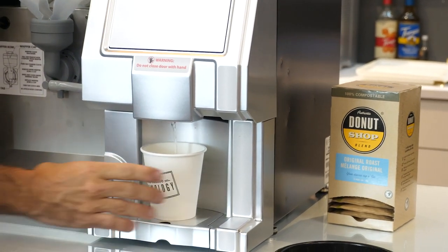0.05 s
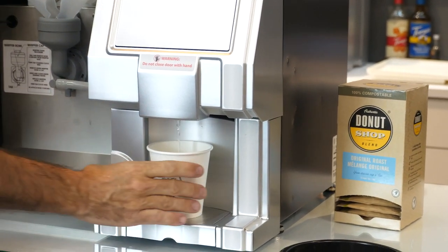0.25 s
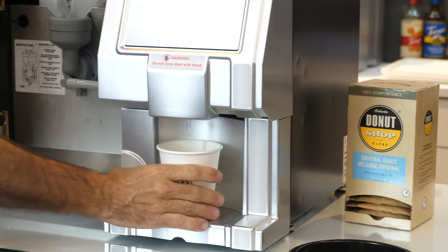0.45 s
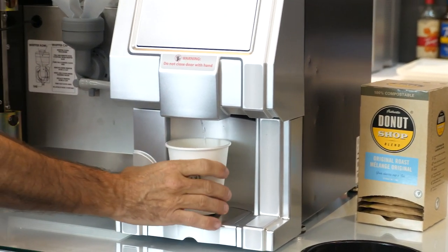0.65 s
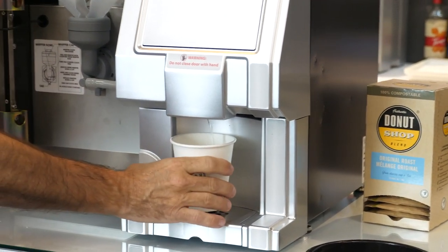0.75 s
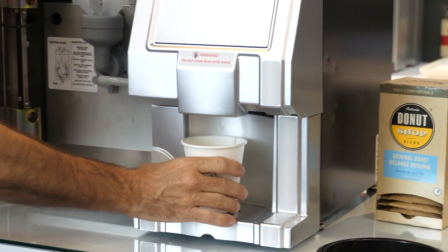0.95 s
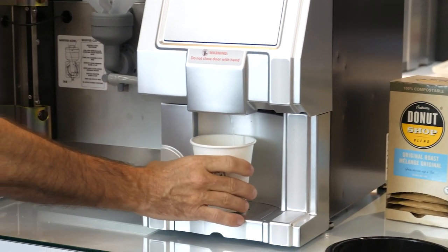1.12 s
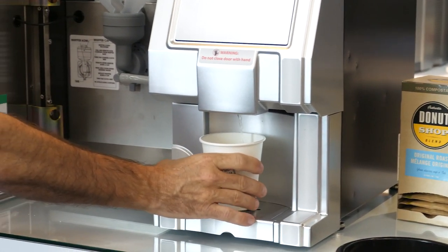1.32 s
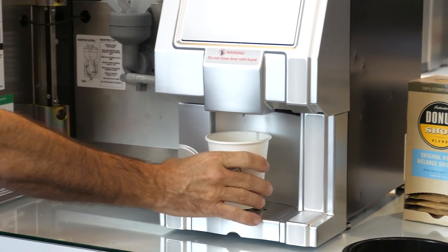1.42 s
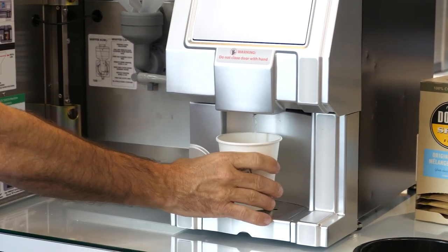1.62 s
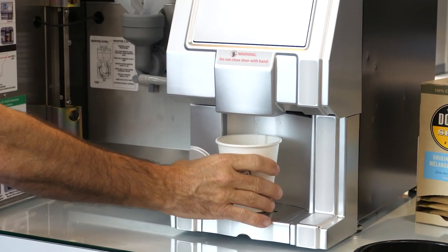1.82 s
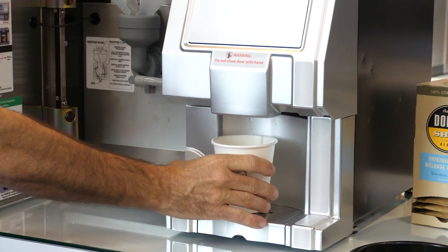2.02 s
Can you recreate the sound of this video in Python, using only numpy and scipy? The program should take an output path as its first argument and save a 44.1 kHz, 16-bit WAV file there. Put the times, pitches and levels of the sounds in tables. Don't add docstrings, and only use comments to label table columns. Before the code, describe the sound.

Water dribbles and plops into a paper cup, gurgling unevenly over a low machine hum.

```python
import sys
import numpy as np
from scipy import signal
from scipy.fft import rfft, irfft, next_fast_len
from scipy.io import wavfile

SR = 44100
rng = np.random.default_rng(int(sys.argv[2]) if len(sys.argv) > 2 else 0)


def transcribe(signal):
    frames = np.atleast_2d(signal).T
    limited = np.clip(frames, -1, 1)
    pcm = np.round(limited * 32767).astype(np.int16)
    wavfile.write(sys.argv[1], SR, pcm)


def undo_db(level):
    steps = np.asarray(level, float) / 20
    return 10 ** steps


N = 91507

# [t/s, hum level/dB]
PUMP_LOAD = [
    (0.0, -55.5),
    (0.84, -51.5),
    (2.07, -52),
]
# [multiple of HUM_HZ, level/dB, wobble/dB]
HUM_LINES = [(.5, -13, 1), (1, 1, 0.4), (2, -2.5, 1.34), (3, -2, -0.65), (4, -15, -6), (5, -12.5, -1),
             (6, -3.5, 1.9), (8, -15.5, 1), (10, -17.5, -0.5), (12, -33, 3)]
HUM_HZ, HUM_TRIM_DB, WOBBLE_PER_S = 120, -2, 6.9
# [f/Hz, level/dB per Hz]
RUMBLE_SPECTRUM = [(12, -11), (28, 7), (50, 2.5), (170, -1), (420, -3.5), (1000, -8.5), (2000, -20.5),
                   (6000, -33.5)]
RUMBLE_DB = -57
# [f/Hz, width/Hz, level/dB]
WHINE_RESONANCES = [(566.2, 19, -68), (3286, 41, -79), (3300, 47, -82), (3480, 29, -82.5),
                    (3446, 1340, -74)]

# [t/s, level/dB]
TRICKLE_FLOW = [
    (0.0, -68.5),
    (0.27, -65),
    (0.58, -63),
    (1.05, -71.5),
    (1.27, -75),
    (1.46, -71.5),
    (1.6, -63.5),
    (1.77, -69.5),
    (1.95, -80),
    (2.07, -72),
]
GURGLES_PER_S, GURGLE_DB, GURGLE_CYCLES = 300, 3, 10.4
GURGLE_LOW_HZ, GURGLE_HIGH_HZ, GURGLE_SOFT_HZ = 632, 2210, 1800
RECESS_T60_S, RECESS_DB, RECESS_CUT_HZ = 0.11, -16.5, 20000

# [t/s, peak level/dB, centre f/Hz]
SPRAY_DROPLETS = [(0.0024, -49, 11000), (0.2232, -44.5, 10400), (0.2364, -52, 11500), (0.634, -55, 10400),
                  (0.776, -51.5, 8600), (0.8619, -49, 13900), (0.8623, -63, 7500), (0.9657, -60, 8000),
                  (1.6197, -48, 13500), (0.716, -54, 9300), (0.9657, -46, 14000), (1.1765, -57, 10400),
                  (1.1955, -45.5, 14400), (1.6197, -48.5, 9150), (1.6921, -52, 13700), (1.722, -46.5, 8800),
                  (1.735, -52.5, 8440), (1.861, -57, 10200), (1.921, -51.5, 10300), (1.949, -54, 8710)]
SPRAY_OCTAVES, SPRAY_T60_S = 0.76, 0.006
# [t/s, peak level/dB, centre f/Hz, width/octaves]
SPLASHES = [(0.0268, -52, 2800, 0.25), (0.0628, -53.5, 2900, 0.28), (1.708, -57, 2920, 0.23),
            (.505, -52, 2560, 0.35), (0.1196, -55, 3000, 0.44), (0.2987, -50.5, 2940, 0.3),
            (0.6055, -53, 3130, 0.37), (0.7751, -51, 3270, 0.42), (0.8054, -55.5, 3430, 0.89),
            (0.8629, -52, 2940, 0.2), (0.9672, -46.5, 3220, 0.62), (1.051, -49, 3130, 0.25),
            (1.496, -54, 2480, 0.69), (1.5718, -54, 2600, 0.33), (1.736, -53, 3250, 0.99),
            (1.7689, -53.5, 3370, 0.42), (1.949, -46, 2750, 0.67), (0.2229, -55.5, 4080, 0.25),
            (0.4728, -54.5, 5600, 0.35), (0.5003, -47, 4300, 0.7), (0.5686, -45, 5200, 0.32),
            (0.674, -58, 5600, 0.46), (.683, -58, 5300, .6), (1.6205, -56, 6500, 0.3),
            (0.8619, -52.5, 4500, 0.44), (0.9662, -58, 4740, 0.37), (1.5324, -50, 6700, 0.63),
            (1.6207, -45, 4920, 0.2), (1.8617, -49, 4770, 0.38), (1.9205, -57, 5150, 0.41),
            (1.949, -51.5, 4160, 0.47)]
SPLASH_T60_S, SPLASH_TRIM_DB, SPLASH_ATTACK_S = 0.011, -1, 0.00063
SPLAT_DB, SPLAT_OCTAVES, SPLAT_T60_S = -8, 0.76, 0.0071
# [t/s, peak level/dB, centre f/Hz]
FLAT_DROPS = [(.142, -46.5, 1400), (0.224, -42.5, 1600), (.807, -54, 1500), (0.966, -56, 1400),
              (0.028, -52, 1600), (.01, -47, 1590), (.063, -52, 2580), (.353, -54, 1100),
              (0.415, -45.5, 1890), (.568, -42, 1880), (0.632, -49, 1600), (.654, -51, 1600),
              (.68, -46.5, 1900), (.742, -46, 1310), (0.862, -47.5, 1300), (1.391, -38, 1450),
              (1.417, -48, 1700), (1.457, -44, 1400), (1.496, -43, 2000), (1.544, -50, 1400),
              (1.606, -54, 1400), (1.621, -55, 1500), (1.672, -46.5, 1870), (1.693, -44, 1700),
              (1.706, -50, 2000), (1.722, -44, 1900), (1.737, -48, 2100), (1.76, -47.5, 1500),
              (1.849, -57, 1800), (1.861, -49, 1390), (1.951, -45.5, 1400), (1.981, -52, 1710)]
SMACK_CYCLES = 5.2

# [t/s, peak level/dB, f/Hz, t60/s]
PLOP_DROPS = [(0.054, -46.5, 864, 0.092), (0.063, -37, 1800, 0.044), (0.209, -47.5, 1256, 0.13),
              (0.224, -37, 1020, 0.015), (0.353, -43.5, 883, 0.04), (0.415, -46, 1880, 0.015),
              (0.432, -44.5, 1270, 0.032), (0.488, -45, 1210, 0.03), (0.569, -40, 1050, 0.028),
              (0.635, -47, 1006, 0.043), (0.655, -39.5, 1050, 0.037), (0.687, -48, 1470, 0.022),
              (0.742, -45, 1450, 0.023), (0.806, -39.5, 1020, 0.019), (0.863, -45.5, 1040, 0.025),
              (1.39, -44, 1520, 0.021), (1.403, -53, 1080, 0.028), (1.417, -56, 1050, 0.022),
              (1.459, -39.5, 1045, 0.045), (1.498, -44.5, 1340, 0.018), (1.557, -47, 1470, 0.025),
              (1.673, -39, 988, 0.031), (1.692, -44, 1400, 0.0074), (1.76, -41.5, 1060, 0.018),
              (1.862, -41.5, 1180, 0.038), (1.886, -38, 1450, 0.021), (1.95, -38.5, 1050, 0.013),
              (1.979, -44.5, 1060, 0.029)]
# [t/s, peak level/dB, f/Hz, t60/s]
TWIN_BUBBLES = [(.064, -35.5, 1540, 0.025), (.143, -48, 1450, 0.024), (.365, -41.5, 865, 0.033),
                (.385, -48, 1010, .025), (.402, -46, 2010, 0.023), (.5, -47.5, 1340, 0.028),
                (.53, -42, 1060, 0.015), (.46, -45.5, 1320, 0.045), (.52, -50, 1280, 0.031),
                (.582, -41, 866, 0.034), (.59, -44.5, 1050, .025), (.6, -44, 900, .03),
                (.627, -48, 605, .03), (.675, -47, 1260, .025), (.7, -50, 1340, .02),
                (.718, -60, 1200, 0.018), (.762, -61, 1390, .015), (.778, -48, 2100, 0.02),
                (.825, -60, 1190, 0.018), (.894, -50, 974, .02), (.953, -52, 1020, .02),
                (1.083, -52.5, 1070, 0.017), (.92, -47.5, 1120, 0.024), (.967, -49, 1350, 0.023),
                (1.197, -46, 1210, 0.018), (1.225, -53, 1490, 0.015), (1.391, -46, 1910, 0.029),
                (1.404, -61, 1800, 0.018), (1.432, -56, 1050, .02), (1.47, -61, 1490, .02),
                (1.573, -54, 1400, .03), (1.587, -58, 1520, .02), (1.643, -49, 1150, 0.015),
                (1.674, -47, 1550, 0.037), (1.71, -45, 1300, 0.029), (1.745, -56, 1500, 0.013),
                (1.811, -52, 1090, 0.018), (1.904, -59, 1420, .015), (2.01, -49, 1070, .02),
                (1.738, -51, 1940, 0.027), (1.863, -52, 1510, 0.023), (1.925, -49, 1050, 0.019),
                (1.951, -42.5, 1550, 0.022), (2.063, -51, 1010, 0.037)]
# [t/s, peak level/dB, f/Hz, t60/s]
GLUG_BUBBLES = [
    (.142, -42, 732, 0.089),
    (.158, -39.5, 748, 0.048),
    (.741, -35.5, 670, 0.024),
    (1.457, -39, 776, 0.03),
    (1.544, -41, 782, 0.054),
    (1.606, -38.5, 717, 0.047),
    (1.622, -43.5, 750, 0.082),
]
PLOP_ATTACK_S, PLOP_TRIM_DB = 0.00044, -3
RISE_PER_S = 5.3
COLLAPSE = 1.023
# [f/Hz, level/dB, t60/s]
CUP_MODES = [(750, -1.5, 0.011), (1050, -2, 0.043), (1450, 5, 0.018), (1892, -4.5, 0.03),
             (2310, -4.5, 0.013), (2926, -5.5, 0.03)]
CUP_DB, CUP_FALL_DB_PER_OCTAVE = -5, 9

# [t/s, peak level/dB, f/Hz, t60/s]
HAND_KNOCKS = [
    (0.502, -49, 287, 0.17),
    (.51, -48, 160, 0.17),
    (.96, -44, 63.6, 0.22),
    (1.579, -52, 55, 0.38),
]

# [f/Hz, level/dB per Hz]
HISS_SPECTRUM = [(100, -10.5), (1000, -6.5), (2500, -3.5), (5000, 0.5), (10000, 0.5), (16000, -1.5)]
HISS_MID_DB, HISS_SIDE_DB = -72.5, -73.5


def rms_one(x):
    return x / np.sqrt(np.mean(x ** 2) + 1e-20)


def in_time(rows):
    s, v = np.transpose(rows)
    return np.interp(np.arange(N) / SR, s, v)


def drift(rate):
    r = np.exp(-80 * np.pi * rate / SR)
    noise = rng.standard_normal(N // 40 + 2002)
    slow = signal.lfilter([1], [1, -2 * r, r * r], noise)[2000:]
    return np.interp(np.arange(N) / 40, np.arange(len(slow)), rms_one(slow))


def ring(clicks, hz, t60):
    r = undo_db(-60 / (t60 * SR))
    w = 2 * np.pi * hz / SR
    return signal.lfilter([0, np.sin(w)], [1, -2 * r * np.cos(w), r * r], clicks + 1e-18)


def coloured(points):
    size = next_fast_len(N)
    hz, db = np.transpose(points)
    f = np.maximum(np.arange(size // 2 + 1) * SR / size, 1)
    gain = undo_db(np.interp(np.log(f), np.log(hz), db))
    return rms_one(irfft(rfft(rng.standard_normal(size)) * gain, size)[:N])


def add(out, s, sound):
    i = int(s * SR)
    out[i:i + len(sound)] += sound[:N - i]


def machine():
    load_db, t = in_time(PUMP_LOAD), np.arange(N) / SR
    hum = np.zeros(N)
    for k, db, wobble_db in HUM_LINES:
        level = undo_db(db + wobble_db * drift(WOBBLE_PER_S))
        hum += level * np.sin(2 * np.pi * (k * HUM_HZ * t + rng.random()))
    whine = np.zeros(N)
    for hz, width, db in WHINE_RESONANCES:
        whine += undo_db(db) * rms_one(ring(rng.standard_normal(N), hz, 4.8 / width))
    rumble = undo_db(RUMBLE_DB + 1.0 * drift(3.0)) * coloured(RUMBLE_SPECTRUM)
    return undo_db(load_db + HUM_TRIM_DB) * hum + undo_db(load_db - load_db.mean()) * (rumble + whine)


def gurgle():
    signs = rng.choice([-1, 1], N)
    born = rng.random(N) < GURGLES_PER_S / SR
    size_class = rng.integers(0, 16, size=N)
    rings = np.zeros(N)
    for k, hz in enumerate(np.geomspace(GURGLE_LOW_HZ, GURGLE_HIGH_HZ, 16)):
        rings += ring(signs * born * (size_class == k), hz, GURGLE_CYCLES / hz)
    b, a = signal.butter(2, GURGLE_SOFT_HZ, fs=SR)
    return undo_db(in_time(TRICKLE_FLOW) + GURGLE_DB) * rms_one(signal.lfilter(b, a, rings))


def recess(x):
    size = next_fast_len(N + SR // 2)
    f = np.arange(size // 2 + 1) * SR / size
    dull = 1 / (1 + 1j * f / RECESS_CUT_HZ)
    response = 0
    for k, lag in enumerate(rng.uniform(.002, .011, size=8)):
        loop = undo_db(-60 * lag / RECESS_T60_S) * dull * np.exp(-2j * np.pi * f * lag)
        response = response + (-1) ** k * loop / (1 - loop)
    return irfft(rfft(x, size) * response, size)[:N]


def splashes(rows, t60):
    out, t = np.zeros(N), np.arange(SR // 20) / SR
    envelope = undo_db(-60 * t / t60) * (1 - np.exp(-t / SPLASH_ATTACK_S))
    for s, db, hz, octaves in rows:
        half = 2 ** (octaves / 2)
        edges = [hz / half, min(hz * half, .45 * SR)]
        band = signal.butter(2, edges, "band", fs=SR, output="sos")
        burst = signal.sosfilt(band, rng.standard_normal(len(t)) * envelope)
        add(out, s, undo_db(db + SPLASH_TRIM_DB) * burst / np.abs(burst).max())
    return out


def smacks():
    out, t = np.zeros(N), np.arange(SR // 50) / SR
    for s, db, hz in FLAT_DROPS:
        decay = undo_db(db + 6 - 60 * t * hz / SMACK_CYCLES)
        add(out, s, decay * np.sin(2 * np.pi * hz * t))
    return out


def plops(rows):
    out, t = np.zeros(N), np.arange(SR // 8) / SR
    attack = 1 - np.exp(-t / PLOP_ATTACK_S)
    for s, db, hz, t60 in rows:
        decay = undo_db(-60 * (t / max(t60, .005)) ** COLLAPSE)
        sound = decay * np.sin(2 * np.pi * hz * (t + RISE_PER_S * t * t / 2))
        for f, mode_db, ring_s in CUP_MODES:
            luck_db = rng.normal(0, 2.24)
            mismatch_db = CUP_FALL_DB_PER_OCTAVE * abs(np.log2(f / hz))
            level = undo_db(CUP_DB + mode_db + luck_db - mismatch_db - 60 * t / ring_s)
            sound += level * np.sin(2 * np.pi * f * undo_db(luck_db / 9) * t)
        add(out, s, undo_db(db + PLOP_TRIM_DB) * attack * sound)
    return out


def knocks():
    out, t = np.zeros(N), np.arange(SR // 3) / SR
    for s, db, hz, t60 in HAND_KNOCKS:
        envelope = undo_db(db - 60 * t / t60) * (1 - np.exp(-t * hz))
        add(out, s, envelope * np.sin(2 * np.pi * hz * t))
    return out


def scene():
    spray = [(*row, SPRAY_OCTAVES) for row in SPRAY_DROPLETS]
    splats = [(s, db + SPLAT_DB, hz, SPLAT_OCTAVES) for s, db, hz, t60 in PLOP_DROPS]
    water = gurgle() + smacks()
    water += splashes(spray, SPRAY_T60_S)
    water += splashes(SPLASHES, SPLASH_T60_S)
    water += splashes(splats, SPLAT_T60_S)
    water += plops(PLOP_DROPS) + plops(GLUG_BUBBLES) + plops(TWIN_BUBBLES)
    mono = machine() + water + undo_db(RECESS_DB) * recess(water) + knocks()
    return np.tile(mono, (2, 1))


def low_pass(x):
    return signal.sosfilt(signal.butter(12, 15800, fs=SR, output="sos"), x)


def record(dry):
    mid = undo_db(HISS_MID_DB) * coloured(HISS_SPECTRUM)
    side = undo_db(HISS_SIDE_DB) * coloured(HISS_SPECTRUM)
    hiss = mid + side * [[1], [-1]]
    top = signal.ellip(12, .5, 60, 15850, fs=SR, output="sos")
    return low_pass(signal.sosfilt(top, dry + hiss))


dry = scene()
out = record(dry)
transcribe(out)
```